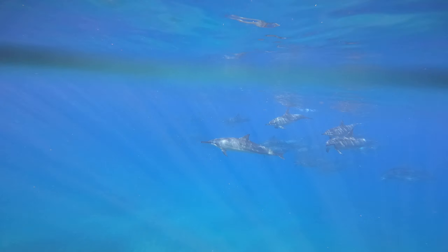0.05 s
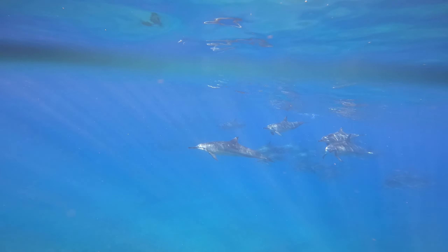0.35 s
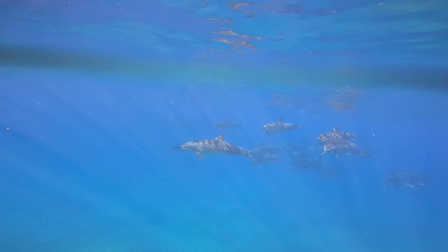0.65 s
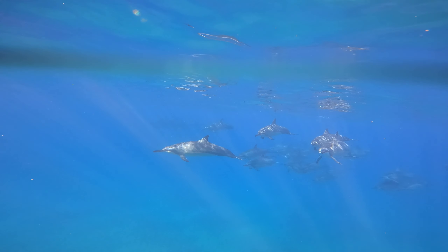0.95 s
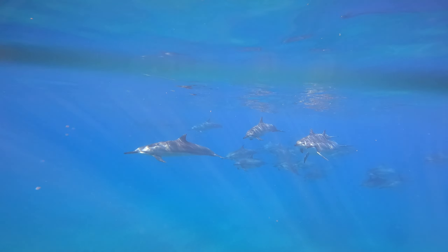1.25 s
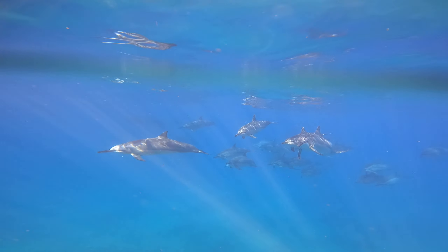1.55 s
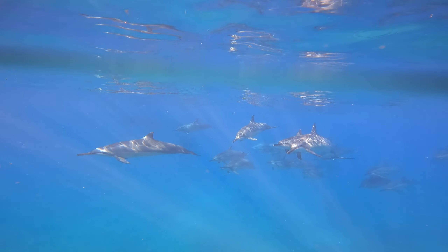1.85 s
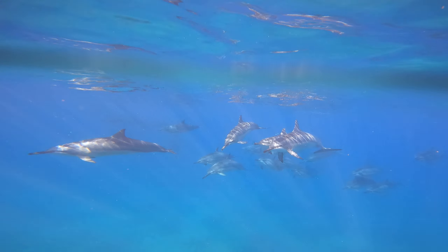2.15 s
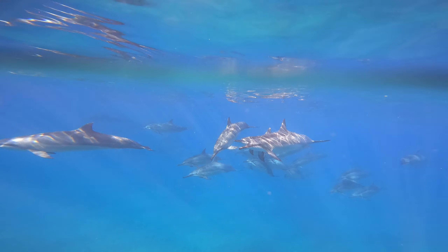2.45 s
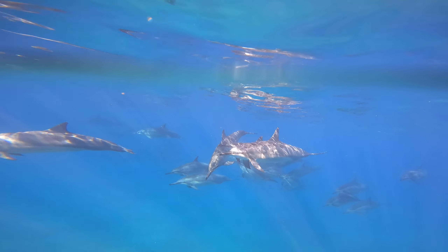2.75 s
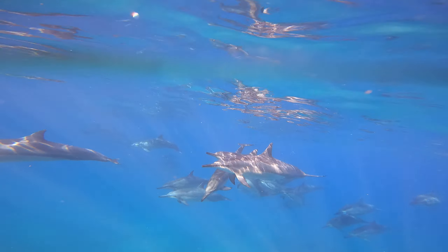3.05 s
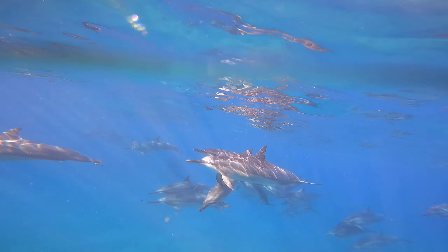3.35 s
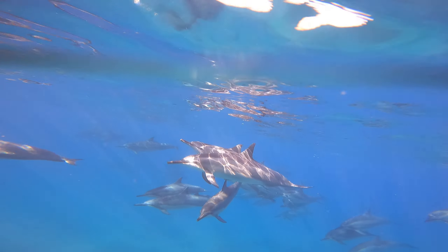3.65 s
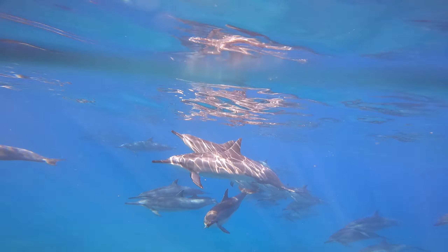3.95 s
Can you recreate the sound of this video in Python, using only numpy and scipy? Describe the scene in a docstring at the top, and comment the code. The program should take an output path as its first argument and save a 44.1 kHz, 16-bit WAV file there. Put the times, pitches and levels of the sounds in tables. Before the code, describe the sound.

Dolphins click and whistle underwater over a deep, fluttering rumble, hollow washes and fine crackle with scattered snaps and bubbles. Two overlapping runs of soft pulses sound from 0.3 to 1.3 seconds, followed by faint ticks. Distant, thin whistles glide from 2 to 2.8 seconds. From 3.4 seconds nearer high whistles sound, one held and one looping. Quick knocks ring the microphone housing from 3.8 seconds, the last loudest.

```python
"""Two short runs of soft pulses sound over rumbling water, heard from a camera housing just under the surface.
Water buffets the housing and washes over it in hollow swells; air pockets gulp and small bubbles ring.
The sea crackles with countless tiny impulses and a few louder snaps. Dolphins send out echolocation
clicks and gliding whistles, far off at first and near at the end, when knocks set the housing ringing."""
import sys
import numpy as np
from scipy import signal
from scipy.fft import rfft, irfft
from scipy.io import wavfile
from scipy.ndimage import uniform_filter1d

SR = 44100
rng = np.random.default_rng(int(sys.argv[2]) if len(sys.argv) > 2 else 0)


def to_wav(s):
    """Save 16-bit WAV."""
    ch = np.atleast_2d(s).T  # columns
    pcm = np.round(np.clip(ch, -1, 1) * 32767)  # PCM
    wavfile.write(sys.argv[1], SR, pcm.astype(np.int16))


N = 176400

# Spectrum of the sea's crackle. Each row: frequency in Hz, relative gain in dB.
SEA_SPECTRUM = [(300, 1.5), (600, 1.5), (1050, -9), (1180, 6), (1350, -3), (1550, 1), (1740, 4.5),
                (2250, -3.5), (2560, 1), (2780, -2), (3000, 3), (3200, -6.5), (3450, 2), (4000, -0.5),
                (4450, 1), (5250, -5.5), (5570, 0), (6100, -7), (6900, -3.5), (9000, -10), (11000, -25.5),
                (15500, -49)]
# Spectrum of an echolocation click. Each row: frequency in Hz, relative gain in dB.
CLICK_SPECTRUM = [(1000, -23), (3000, 0), (7000, -4), (10500, -10.5), (12500, -14.5), (14000, -25),
                  (15500, -35)]
SIDE_DB = -31.5  # side signal relative to mid: the two channels are nearly alike


def undb(db):
    """Decibels express an amplitude ratio on a logarithmic scale; this returns the ratio."""
    return 10 ** (np.asarray(db) / 20)


def unit(x):
    """Normalisation to an rms of 1."""
    return x / np.sqrt(np.mean(x ** 2))


def curve(rows, column=1):
    """Linear interpolation of one column of a table over time."""
    rows = np.array(rows)
    return np.interp(np.arange(N) / SR, rows[:, 0], rows[:, column])


def wander(rate_hz):
    """Low-pass noise: random steps, smoothed twice, at an rms of 1."""
    hold = int(SR / rate_hz)
    steps = np.repeat(rng.standard_normal(N // hold + 1), hold)
    return unit(uniform_filter1d(uniform_filter1d(steps, hold), hold)[:N])


def colour(x, spectrum):
    """Minimum-phase filtering through (Hz, dB) points: causal, so its peaks ring on. The rms is 1."""
    hz, db = np.array(spectrum).T
    size = x.shape[-1]
    f = np.maximum(np.fft.rfftfreq(size, 1 / SR), 1)
    gain = undb(np.interp(np.log(f), np.log(hz), db)) / np.sqrt(1 + (f / hz[-1] / 2) ** 10)
    cepstrum = irfft(np.log(gain), size)[:size // 2]
    response = np.exp(2 * rfft(cepstrum, size))
    return unit(irfft(rfft(x) * response, size))


def stereo_noise(size, side_db=SIDE_DB):
    """Partly coherent white noise: a common signal plus and minus a weaker side signal."""
    mid, side = rng.standard_normal((2, size))
    return mid + undb(side_db) * side * np.array([[1], [-1]])


def decay(t, t60):
    """Exponential damping, by 60 dB in t60 seconds."""
    return np.exp(-np.log(1000) * t / t60)


def add(out, start, sound):
    """Superposition of a sound on the mix, from a start in seconds."""
    i = int(start * SR)
    part = sound[..., :max(N - i, 0)]
    out[:, i:i + part.shape[-1]] += part


def burst(spectrum, rise_s, t60, side_db=SIDE_DB, size=8192):
    """Transient excitation: a short pressure burst rings a set of resonances."""
    t = np.arange(size) / SR
    envelope = np.minimum(t / rise_s, 1) * decay(np.maximum(t - rise_s, 0), t60)
    return colour(stereo_noise(size, side_db) * envelope, spectrum) * np.sqrt(np.mean(envelope ** 2))


def sea_band(hz, octaves):
    """Band-pass weighting of the sea's spectrum, 3 dB down at the given octaves from the centre."""
    return [(f, db - min(3 * (np.log2(f / hz) / octaves) ** 2, 24)) for f, db in SEA_SPECTRUM]


def grains(per_s, spectrum, t60=0.042, spread_db=3.5):
    """A Poisson process: short grains of uneven strength add in power, blurred by distance."""
    onsets = rng.random(N) < per_s / SR
    strength = undb(spread_db * np.minimum(rng.exponential(size=N), 5))
    power = signal.lfilter([1], [1, -decay(1 / SR, t60) ** 2], onsets * strength ** 2 + 1e-12)
    envelope = np.sqrt(np.abs(uniform_filter1d(power, 100)))
    return colour(stereo_noise(N) * envelope, spectrum)


def buffeting():
    """Flow noise: water pushing on the housing makes a deep, fluttering rumble."""
    # Each row: frequency in Hz, relative gain in dB.
    spectrum = [(10, -29.5), (20, -5), (27, -2), (33, -0.5), (42, -11.5), (60, -17.5), (100, -29.5),
                (135, -43.5), (220, -46), (400, -54), (600, -68.5)]
    # Each row: time in seconds, relative level in dB.
    surges = [(.3, -1), (.48, 3), (.57, 13), (.69, -1), (.82, 9.5), (.97, 2), (1.12, 8.5), (1.38, -2.5),
              (1.75, 4.5), (2.1, -0.5), (2.45, 3), (2.8, 3), (3.16, 0), (3.33, 5.5), (4, 2)]
    flutter = undb(1.5 * wander(rate_hz=17))
    return unit(colour(rng.standard_normal(N), spectrum) * flutter) * undb(curve(surges) - 32.5)


def wash():
    """Amplitude-modulated noise with a hollow peak: water churns over the housing, swells and ebbs."""
    # Each row: frequency in Hz, relative gain in dB.
    spectrum = [(100, -14), (170, -13), (250, -10), (310, -0.5), (400, 2.5), (435, -5), (480, -20),
                (700, -30), (1000, -44)]
    # Each row: time in seconds, level in dB.
    swells = [(.3, -51.5), (.44, -55.5), (.57, -67), (.77, -43.5), (1.1, -46), (1.46, -45), (1.6, -63.5),
              (1.69, -50.5), (2.0, -49.5), (2.45, -48), (2.7, -56), (2.91, -61.5), (3.08, -51),
              (3.55, -49.5), (3.78, -53.5), (3.9, -61.5), (4, -61)]
    churn = undb(2 * wander(rate_hz=60))
    return colour(rng.standard_normal(N) * churn, spectrum) * undb(curve(swells))


def crackle():
    """Incoherent summation of tiny snaps, pops and the pod's clicks; the farthest merge into a hiss."""
    # Each row: time in seconds, overall level in dB.
    levels = [(.3, -58), (.45, -58.5), (.8, -58), (1.3, -61), (1.9, -62.5), (2.6, -60), (3.0, -62.5),
              (3.5, -59.5), (4, -61.5)]
    pops = sum(grains(120, sea_band(hz, octaves=0.32)) for hz in (1290, 1710, 2880, 4250, 7100))
    ticks = grains(570, SEA_SPECTRUM)
    pod = grains(110, CLICK_SPECTRUM, t60=0.015)
    hiss = colour(stereo_noise(N), SEA_SPECTRUM)
    return (undb(-13) * pops + undb(-5) * ticks + undb(-13.5) * pod + undb(-5.5) * hiss) * undb(curve(levels))


def gulps(half_width_s=0.0038):
    """Air pockets collapse against the housing, each a Gaussian wave packet of a low tone."""
    # Each row: time of the peak in seconds, pitch in Hz, peak level in dB.
    pockets = [(0.436, 338, -36), (1.33, 340, -36), (1.432, 194, -35.5), (1.482, 218, -40.5)]
    t = np.arange(N) / SR
    return sum(undb(db) * np.cos(2 * np.pi * hz * (t - at)) * np.exp(-((t - at) / half_width_s) ** 2)
               for at, hz, db in pockets)


def snaps():
    """Diffuse reflection: the rippled surface returns each sharp snap as a blur."""
    # Each row: start in seconds, relative level in dB, centre in Hz, half-width in octaves.
    events = [(0.3113, -47, 3800, 0.38), (0.8353, -45, 4050, 0.6), (1.1126, -34.5, 3060, 0.18),
              (1.117, -40.5, 2740, 0.96), (1.327, -50, 4300, 0.97), (1.4043, -48, 3700, .3),
              (1.609, -47, 4600, 0.74), (1.6152, -42.5, 3840, 0.63), (2.0862, -44, 4320, 0.43),
              (2.5662, -45.5, 3020, 0.3), (2.602, -48, 4380, .6), (2.844, -42, 3600, 0.89),
              (3.562, -43, 5940, 0.46)]
    out = np.zeros((2, N))
    for start, db, hz, octaves in events:
        band = sea_band(hz, octaves)
        direct = burst(band, rise_s=0.00048, t60=0.026)
        echo = undb(-13.5) * burst(band, rise_s=0.0077, t60=0.11)
        add(out, start, undb(db - 3.5) * (direct + echo))
    return out


def bubbles(glide_per_s=0.92, wobble=0.022, attack_s=0.0025):
    """Damped oscillators: small bubbles wobble, ring briefly and rise in pitch."""
    # Each row: start in seconds, starting pitch in Hz, level in dB.
    events = [(1.355, 1595, -51), (1.367, 3020, -52.5), (2.296, 1174, -49.5), (2.378, 1180, -53),
              (2.473, 1155, -53), (2.738, 4410, -46.5), (3.18, 694, -53.5), (3.242, 1725, -49),
              (3.25, 767, -51.5), (3.295, 594, -53), (3.797, 1397, -42.5)]
    out, t = np.zeros((2, N)), np.arange(N) / SR
    envelope = np.minimum(t / attack_s, 1) * decay(t, t60=0.077)
    for start, hz, db in events:
        pitch = hz * (1 + glide_per_s * t + wobble * wander(rate_hz=630))
        add(out, start, undb(db) * envelope * np.sin(2 * np.pi * np.cumsum(pitch) / SR))
    return out


def knocks(pan_db=2.5, side_db=-7.5):
    """Impacts excite the modes of the housing: a crack and a short ring."""
    # Each row: start in seconds, relative level in dB, spectral tilt in dB per octave.
    taps = [(3.8, -36, -8), (3.8704, -36, -5.5), (3.904, -35, -5.5), (3.92, -36.5, -4), (3.9242, -32, -3.5),
            (3.9349, -34, -5), (3.949, -41, 7), (3.958, -38, -1), (3.966, -34.5, -4.5), (3.977, -41, 0),
            (3.9844, -20.5, 2.5), (3.992, -41, -8)]
    # Resonances of the housing. Each row: frequency in Hz, relative gain in dB.
    housing = [(400, -26), (720, -13), (900, -15.5), (1200, -3.5), (1600, -5.5), (2000, -7), (2580, 4.5),
               (3030, 2), (3400, 2.5), (3830, -5), (4720, 0.5), (5500, -10), (6430, -5), (8000, -21.5),
               (12000, -33), (15500, -54)]
    out = np.zeros((2, N))
    for start, db, tilt in taps:
        spectrum = [(hz, gain + tilt * np.log2(hz)) for hz, gain in housing]
        crack = burst(spectrum, rise_s=0.00097, t60=0.02, side_db=side_db)
        ring = undb(-13) * burst(spectrum, rise_s=0.0013, t60=0.13, side_db=side_db)
        add(out, start, undb(db - 3.5) * (crack + ring))
    return out * undb([[pan_db / 2], [-pan_db / 2]])


def echolocation():
    """Brief pulses have broad spectra: the dolphins' clicks are heard as thin ticks."""
    # Each row: start in seconds, relative level in dB.
    clicks = [(0.9877, -65), (1.1014, -60.5), (1.207, -62), (1.2535, -64), (1.322, -64), (1.504, -64),
              (1.53, -62), (1.549, -65), (1.5943, -65), (1.6376, -61), (1.6831, -62), (1.705, -62.5),
              (1.7277, -62.5), (1.7513, -66), (1.7723, -64), (1.7973, -62), (1.8222, -60.5),
              (1.8532, -61.5), (1.9156, -68), (3.048, -65), (3.1682, -75), (3.2146, -64)]
    out = np.zeros((2, N))
    for start, db in clicks:
        add(out, start, undb(db + 5) * burst(CLICK_SPECTRUM, rise_s=0.0016, t60=0.021))
    return out


def creak(first_hz=1010, floor_hz=680, sag_s=0.12, rise_s=0.005, ring_s=0.0023):
    """A pulse train, about 30 a second: each is a puff of noise with a resonance that sinks along the run."""
    # Each row: time of the peak in seconds, relative level in dB.
    pulses = [(0.319, -44), (0.355, -38.5), (0.396, -39.5), (0.433, -38.5), (0.468, -37.5), (0.499, -40),
              (0.531, -40), (0.564, -41.5), (0.598, -42.5), (0.63, -49), (0.66, -43), (0.69, -46),
              (0.72, -43)]
    # Each row: frequency in Hz, relative gain in dB.
    puff_spectrum = [(500, -7), (700, 1.5), (970, 2.5), (1070, -15), (1200, 8), (1350, -4.5), (1650, 4),
                     (3000, -21)]
    out = np.zeros((2, N))
    for at, db in pulses:
        puff = burst(puff_spectrum, rise_s, t60=0.13)
        t = np.arange(puff.shape[-1]) / SR - rise_s
        hz = floor_hz + (first_hz - floor_hz) * np.exp(-(at - pulses[0][0]) / sag_s)
        ring = np.cos(2 * np.pi * hz * t) * np.exp(-np.abs(t) / ring_s)
        add(out, at - rise_s, undb(db) * (undb(-4.5) * ring + undb(-11.5) * puff))
    return out


def bright_pulses():
    """A slower pulse train, about 10 a second, excites a resonance near 2 kHz."""
    # Each row: start in seconds, relative level in dB.
    pulses = [(.356, -47), (.463, -36.5), (0.5713, -34.5), (0.6711, -34), (0.771, -35.5), (0.8795, -37),
              (0.9863, -43), (1.1015, -41), (1.2049, -42.5), (1.32, -44.5)]
    # Each row: frequency in Hz, relative gain in dB.
    spectrum = [(700, -14.5), (1500, -7.5), (2000, 5.5), (2600, -15.5), (4200, -12.5), (7000, -17),
                (11000, -40)]
    out = np.zeros((2, N))
    for start, db in pulses:
        add(out, start, undb(db - 11.5) * burst(spectrum, rise_s=0.0011, t60=0.073))
    return out


def whistle(contour, image_db, waver, pan_db=0, mirror_hz=12000, edge_s=0.0012):
    """Frequency modulation: a pure tone glides and wavers, with a fainter image folded about mirror_hz."""
    t = np.arange(N) / SR
    hz = curve(contour) * (1 + waver * wander(rate_hz=300))
    tone, image = (np.sqrt(2) * np.sin(2 * np.pi * np.cumsum(f) / SR) for f in (hz, 2 * mirror_hz - hz))
    image_gain = undb(image_db - 9 * np.abs(hz - mirror_hz) / 1000)  # 9 dB less per kHz from the fold
    gate = np.clip((t - contour[0][0]) / edge_s, 0, 1) * np.clip((contour[-1][0] - t) / edge_s + 1, 0, 1)
    level = undb(curve(contour, column=2) + wander(rate_hz=70))  # flutters by about 1 dB
    sides = undb(pan_db / 2 * np.array([[1], [-1]]))
    return (tone + image_gain * image) * gate * level * sides / sides.mean(axis=0)


def whistles(echo_s=0.00463, tail_samples=8192):
    """Multipath propagation: the dolphins' whistles arrive directly and by way of the rippled surface."""
    # Distant calls. Each row: time in seconds, pitch in Hz, level in dB.
    far_call = [(2.055, 15400, -86), (2.075, 13900, -76), (2.1, 12550, -69), (2.135, 11830, -67.5),
                (2.21, 12100, -70), (2.25, 12450, -74), (2.32, 12600, -74), (2.38, 12780, -71.5),
                (2.425, 13200, -74), (2.52, 13200, -75), (2.6, 14080, -74), (2.665, 14650, -78)]
    far_chirp = [(2.695, 9250, -73), (2.73, 9500, -68), (2.78, 9720, -73)]
    falling = [(3.342, 15400, -79), (3.355, 13600, -76), (3.378, 12300, -58), (3.395, 12000, -70),
               (3.42, 11950, -58)]
    # Near calls. Each row: time in seconds, pitch in Hz, level in dB, left over right in dB.
    looping = [(3.598, 9050, -51, 0), (3.625, 10750, -71, 4), (3.642, 11240, -58, 3), (3.69, 11080, -56, 4),
               (3.74, 11300, -54, 3), (3.765, 10570, -63, 12), (3.79, 9360, -49, 20),
               (3.815, 9120, -45, 12), (3.845, 9530, -55, 23), (3.88, 11150, -57, 8),
               (3.915, 12350, -49, 3), (3.955, 12800, -64, 7), (4.0, 14200, -73, 8)]
    held = [(3.42, 9470, -36, 3), (3.435, 9410, -36, 3), (3.453, 9280, -40, 3), (3.468, 9180, -47, 1),
            (3.489, 9155, -42, -7), (3.517, 9165, -47, -9), (3.533, 9122, -40, -5), (3.583, 9129, -44, -9),
            (3.631, 9088, -39, -4), (3.703, 9088, -42, -6), (3.727, 9040, -36, -2), (3.755, 9010, -39, -1),
            (3.81, 8980, -39, 1), (3.9, 9032, -38, -1), (3.94, 9012, -38, -2), (4.0, 9031, -38, -2)]
    far = whistle(far_call, image_db=-11, waver=0.0022, pan_db=-10.5)
    far += whistle(far_chirp, image_db=-11, waver=0.015)
    gliding = whistle(falling, image_db=-11, waver=0.0022)
    gliding += whistle(looping, image_db=-2, waver=0.0047, pan_db=curve(looping, column=3))
    calls = far + gliding + whistle(held, image_db=-2, waver=0.00068, pan_db=curve(held, column=3))
    # The surface mirrors the gliding whistles and makes them beat.
    add(calls, echo_s, undb(-15 + 2 * wander(rate_hz=130)) * gliding)
    scatter = stereo_noise(tail_samples) * decay(np.arange(tail_samples) / SR, t60=0.16)
    scatter /= np.sqrt(np.sum(scatter[0] ** 2))
    return calls + undb(-13.5) * signal.fftconvolve(calls, scatter, axes=1)[:, :N]


def scene():
    """Linear superposition: the pressures of all sources in the water add."""
    water = buffeting() + wash() + crackle() + gulps() + snaps() + bubbles()
    dolphins = echolocation() + creak() + bright_pulses() + whistles()
    return water + dolphins + knocks()


def record(dry, start_s=0.25, fade_s=0.062, top_hz=15700):
    """Band limiting: a steep low-pass cuts the top, and the sound fades in after a brief silence."""
    opening = np.clip((np.arange(N) / SR - start_s) / fade_s, 0, 1) ** 2
    return signal.sosfilt(signal.ellip(10, .1, 80, top_hz, fs=SR, output="sos"), dry * opening)


dry = scene()
out = record(dry)
to_wav(out)
```